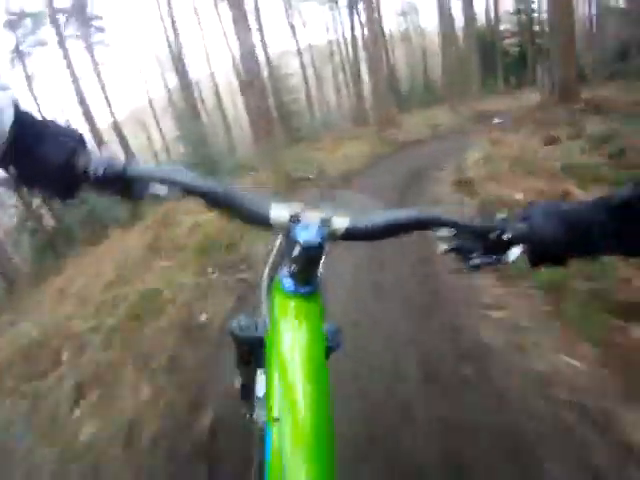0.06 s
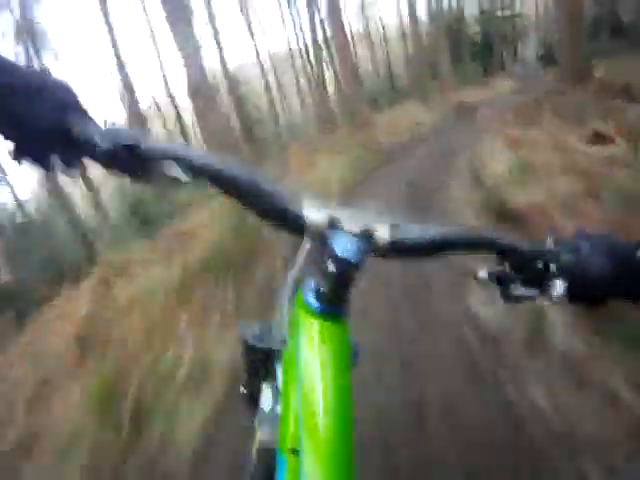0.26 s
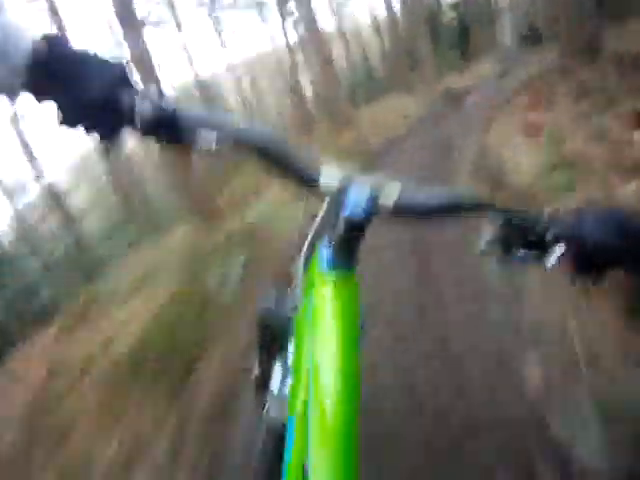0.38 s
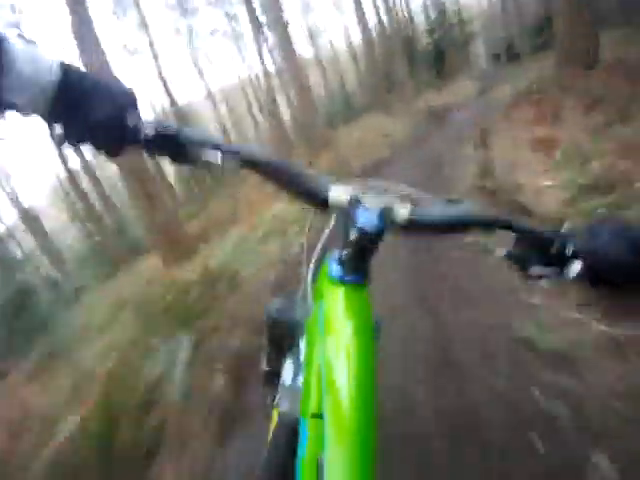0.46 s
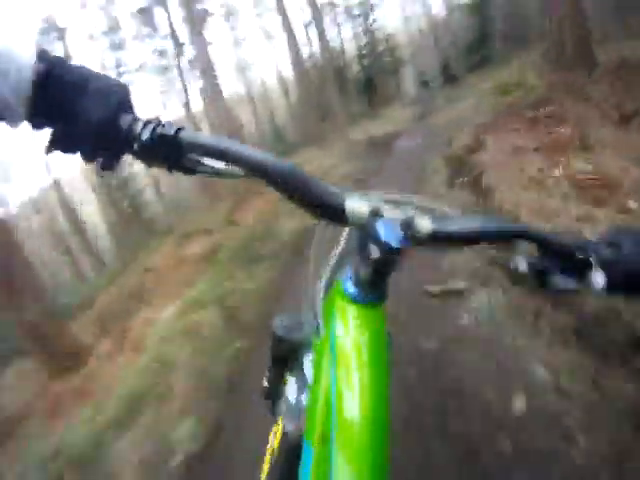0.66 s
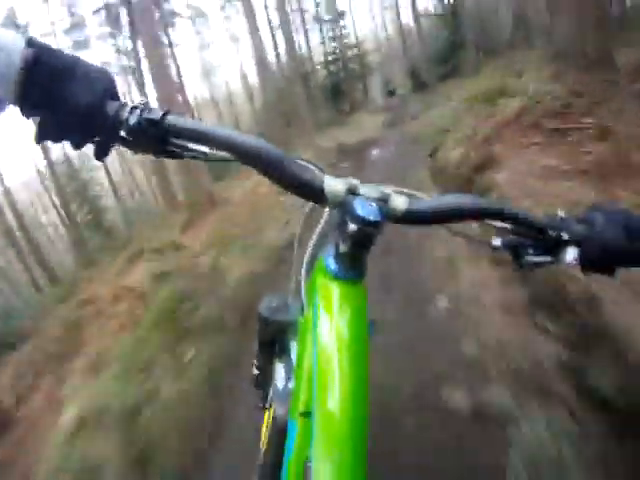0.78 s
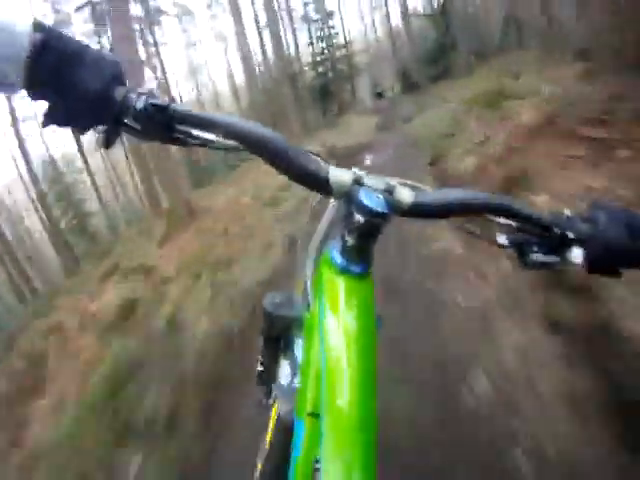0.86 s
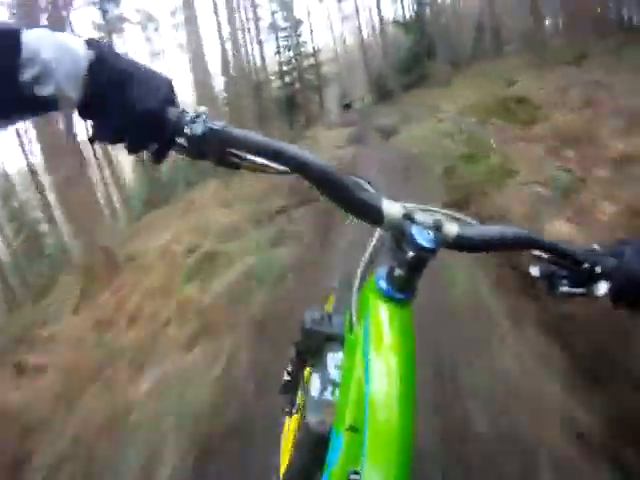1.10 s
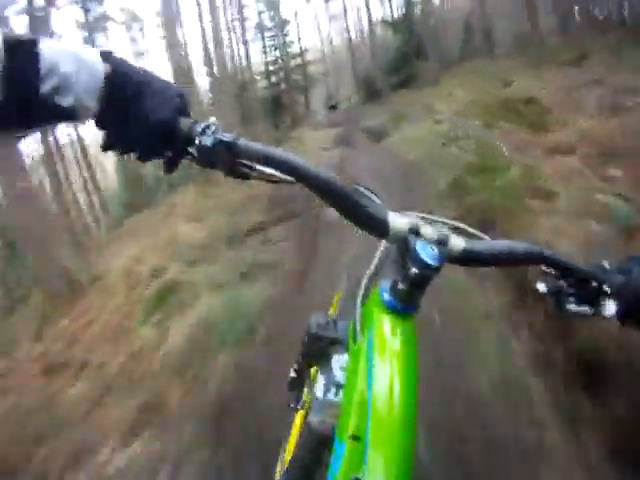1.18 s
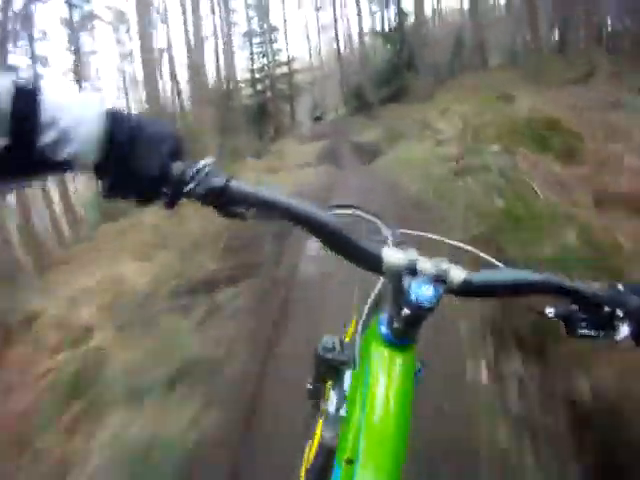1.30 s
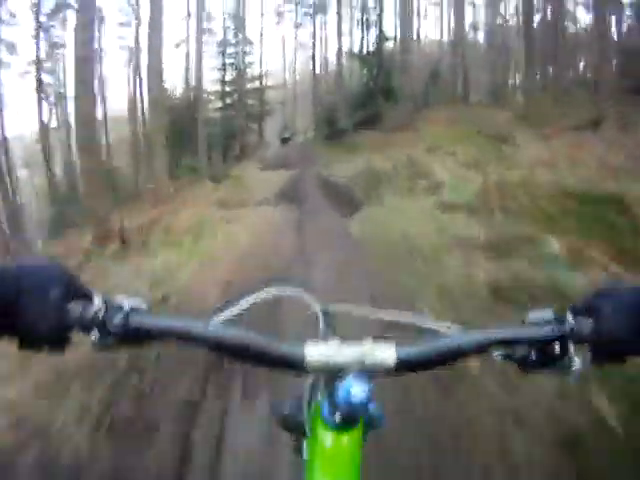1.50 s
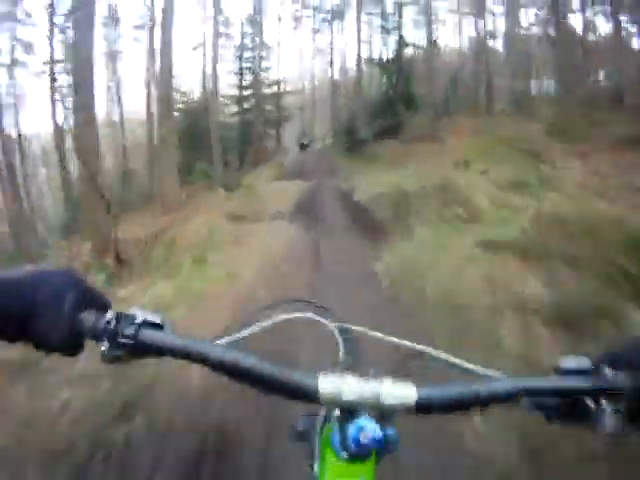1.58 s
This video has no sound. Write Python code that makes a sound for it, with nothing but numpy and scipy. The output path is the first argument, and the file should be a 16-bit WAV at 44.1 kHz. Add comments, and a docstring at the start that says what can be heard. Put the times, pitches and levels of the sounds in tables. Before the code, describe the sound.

A mountain bike rattles down a dirt trail, heard from a microphone on the rider. Sharp plastic clacks, chain ticks and wheel thumps cluster early, then ease into lighter chatter over tyre hiss and low wind rumble.

```python
"""A mountain bike runs down a dirt trail, heard from a camera in a plastic housing on the rider.
It opens on a bed of wind rumble, gritty tyre hiss and fine chatter, with a few light clacks.
From 0.24 s a rough patch hits: the housing clacks and knocks in its mount, chain and cables tick
and the wheels thump. The hardest clack overloads the microphone at 0.4 s; the frame shudders at 0.6 s.
After 0.75 s the ride settles back to the bed, with softer bumps and stray ticks and clacks."""
import sys
import numpy as np
from scipy import signal
from scipy.fft import rfft, irfft
from scipy.io import wavfile

SR = 44100
rng = np.random.default_rng(int(sys.argv[2]) if len(sys.argv) > 2 else 0)


def unload_audio(sound):
    """Save the sound as a 16-bit wav file, at the path given as the first command line argument."""
    columns = np.transpose(np.atleast_2d(sound))
    # keep every value between -1 and 1, then stretch to whole-number steps
    steps = np.round(np.clip(columns, -1, 1) * 32767)
    wavfile.write(sys.argv[1], SR, steps.astype(np.int16))


N = 72765
TIME = np.arange(N) / SR

# fader for the wind buffeting: t/s, level/dB
WIND_FADER = [(0, -51), (.06, -40), (.13, -42.5), (.22, -47), (.29, -39.5), (.37, -39), (.43, -31.5),
              (.52, -34.5), (.6, -33), (.67, -33), (.77, -41), (.87, -41.5), (1.05, -47.5), (1.15, -46),
              (1.3, -43), (1.44, -53), (1.54, -41), (1.65, -55)]
# tone of the wind: f/Hz, level/dB
WIND_EQ = [(10, -10.5), (25, 2), (50, -9.5), (100, -18), (200, -39), (1000, -83)]
# fader for the ground rumble through bike and rider: t/s, level/dB
GROUND_FADER = [(0, -51.5), (.03, -46), (.07, -56.5), (.2, -62), (.26, -43), (.34, -41), (.38, -38.5),
                (.45, -41), (.5, -47), (.54, -44.5), (.6, -31), (.67, -55.5), (.74, -41.5), (.8, -54),
                (.94, -54), (1.05, -57.5), (1.14, -54), (1.22, -54), (1.33, -51), (1.42, -54.5),
                (1.53, -48), (1.65, -58.5)]
# tone of the ground rumble: f/Hz, level/dB
GROUND_EQ = [(30, -26), (80, 3), (130, 1), (200, -3.5), (290, -10.5), (420, -20), (700, -21.5), (1200, -51),
             (3000, -58)]
# fader for the tyres on dirt: t/s, level/dB
TYRE_FADER = [(0, -47), (.13, -48), (.22, -49), (.32, -44.5), (.42, -41.5), (.51, -46.5), (.6, -43.5),
              (.76, -43), (.9, -44.5), (1.05, -47.5), (1.15, -46), (1.22, -47.5), (1.44, -46), (1.65, -47)]
# tone of tyre noise and clack grit through the housing: f/Hz, level/dB
GRIT_EQ = [(200, -30), (400, -13), (780, -12), (1130, -4.5), (1280, -11), (1550, -12.5), (1800, -2),
           (1920, 4.5), (2200, -4), (2540, -3), (2780, -5.5), (3200, 1), (3650, -9.5), (4300, -10.5),
           (5600, -13), (7500, -16), (8600, -11), (10200, -13.5), (11400, -35), (12800, -19.5),
           (14300, -18), (15300, -13)]
# fader for the chatter of loose parts: t/s, level/dB
CHATTER_FADER = [(0, -41), (.06, -48), (.088, -46.5), (.12, -55.5), (.22, -47.5), (.3, -38.5), (.325, -34),
                 (.342, -26.5), (.37, -42.5), (.41, -28), (.445, -42.5), (.47, -40.5), (.505, -59),
                 (.545, -34.5), (.58, -48.5), (.6, -33), (.625, -45.5), (.72, -41.5), (.745, -43),
                 (.775, -37), (.8, -50.5), (.88, -49), (.905, -42), (.94, -53.5), (1, -48), (1.05, -58),
                 (1.15, -50), (1.23, -58), (1.31, -42.5), (1.35, -59), (1.44, -46), (1.5, -51.5),
                 (1.65, -52)]
# bumps under the wheels: t/s, level/dB, half width/s
BUMP_CUES = [(0.0258, -31.5, 0.0017), (0.033, -32, 0.0017), (.056, -32, 0.011), (0.2445, -29.5, 0.0019),
             (0.266, -36, 0.0028), (0.2841, -16, 0.0016), (0.408, -27, 0.0017), (0.4221, -18.5, 0.0019),
             (.462, -23.5, 0.0029), (0.497, -28, 0.0018), (.527, -25, 0.0038), (.566, -22.5, 0.0034),
             (0.604, -16.5, 0.0031), (0.613, -20, 0.0045), (0.641, -18, .0015), (0.7427, -15, 0.0032),
             (0.825, -31, 0.0097), (0.945, -22, 0.0073), (1.135, -25.5, 0.0029), (1.168, -35, 0.0044),
             (1.36, -31, 0.0091), (1.546, -30.5, 0.0032)]
# ticks of chain and cables: t/s, level/dB
TICK_CUES = [(.2541, -31), (.4395, -29), (.4872, -20), (.6047, -15.5), (.6105, -28), (.823, -31.5),
             (.851, -32.5), (.955, -44), (1.271, -38), (1.401, -38)]
# ring of the ticking metal: f/Hz, t60/s, level/dB
METAL_MODES = [(2010, 0.019, -8.5), (3717, 0.012, -1.5), (4120, 0.0089, -5.5), (4960, 0.024, -19.5),
               (7640, 0.0076, -7), (8260, 0.013, -8), (9800, 0.0092, -17)]
# ring of the housing: f/Hz, t60/s, level in a sharp clack/dB, level in a dull knock/dB
PLASTIC_MODES = [(246, 0.033, -21.5, -22.5), (649, 0.021, -21.5, -22.5), (1165, 0.021, -18, -10),
                 (1494, 0.016, -27, -6.5), (1880, 0.015, -2.5, -4), (2226, .011, 5, -2),
                 (2481, 0.012, -5.5, -18), (3603, 0.01, -4, -24.5), (5180, 0.0039, -4, -16.5),
                 (6790, 0.004, -8, -17), (8426, 0.014, -13.5, -30), (9736, 0.012, -8.5, -15.5),
                 (10530, 0.005, -28, -9.5), (14220, 0.0098, -9, -12.5)]
# the housing slaps its hard stop: t/s, level/dB, low cut/Hz
CLACK_CUES = [(.0802, -26.5, 1480), (.083, -35, 1500), (0.0886, -26, 1485), (0.196, -28.5, 1500),
              (0.2427, -0.5, 1550), (0.3392, -28, 400), (0.4039, 4, 150), (.5462, -27, 600),
              (0.6682, -24.5, 600), (.9015, -29, 1000), (1.437, -32, 1500)]
# it falls back on the padded stop: t/s, level/dB
KNOCK_CUES = [(0.2818, 1.5), (0.4181, -1.5), (0.5099, -20), (0.573, -20.5), (.6367, -3.5)]
# three narrow dips from the housing, then two notches from the camera's filters: f/Hz, width/Hz, depth/dB
NOTCHES = [(891, 180, -4), (1348, 27, -9), (3007, 83, -6.5), (5994, 740, -29), (12250, 1900, -22)]

CLACK_ATTACK_S, KNOCK_ATTACK_S = 0.0011, 0.00079


def from_db(db):
    """Decibels to gain."""
    return 10 ** (np.asarray(db) / 20)


def rms_one(x):
    """Scale to unit rms."""
    return x / np.sqrt(np.mean(x ** 2) + 1e-20)


def fader(curve):
    """Ride the gain along rows of t/s, level/dB."""
    return from_db(np.interp(TIME, *np.transpose(curve)))


def equalise(x, eq):
    """Shape a steady sound with rows of f/Hz, level/dB; rms 1."""
    hz, db = np.transpose(eq)
    bins_hz = np.maximum(np.fft.rfftfreq(N, 1 / SR), 1)
    gain = from_db(np.interp(np.log(bins_hz), np.log(hz), db))
    return rms_one(irfft(rfft(x) * gain, N))


def low_cut(x, hz):
    """Roll off the lows below hz."""
    return signal.sosfilt(signal.butter(2, hz, "high", fs=SR, output="sos"), x)


def drift(rate_hz):
    """Slow random wander; rms 1."""
    smoothing = signal.butter(2, rate_hz, fs=SR, output="sos")
    return rms_one(signal.sosfilt(smoothing, rng.standard_normal(2 * N))[N:])


def grains(per_s, spread_db):
    """A scatter of clicks of uneven size."""
    sizes = from_db(spread_db * np.minimum(rng.exponential(1, N), 4)) * rng.choice([-1, 1], N)
    return sizes * (rng.random(N) < per_s / SR)


def ring(modes, start_s, attack_s):
    """One hit on modes of f/Hz, t60/s, level/dB: a quick swell, then each mode dies away."""
    t = np.maximum(TIME[:N // 10] - start_s % (1 / SR), 0)
    tone = sum(from_db(db - 60 * t / t60) * np.sin(2 * np.pi * hz * t) for hz, t60, db in modes)
    attack = 1 - np.exp(-(t / attack_s) ** 2)
    return np.concatenate([np.zeros(int(start_s * SR)), tone * attack, np.zeros(N)])[:N]


def rumble():
    """The low bed: wind buffets the microphone and rough ground drums a little higher."""
    wind, ground = rng.standard_normal((2, N))
    buffeting = fader(WIND_FADER) * equalise(wind, WIND_EQ)
    drumming = fader(GROUND_FADER) * equalise(ground, GROUND_EQ)
    return buffeting + drumming


def tyres():
    """Fluttering hiss and grit of tyres on dirt, coloured by the housing."""
    grit = from_db(-3) * rms_one(grains(per_s=700, spread_db=2))
    flutter = from_db(1.8 * drift(rate_hz=100))
    hiss = rng.standard_normal(N)
    return fader(TYRE_FADER) * equalise((hiss + grit) * flutter, GRIT_EQ)


def chatter(decay_scale=0.72):
    """Trail vibration keeps up a dense run of tiny, short taps on both stops of the housing."""
    out = 0
    for stop in range(2):  # hard, then padded
        modes = [(hz, t60 * decay_scale, dbs[stop]) for hz, t60, *dbs in PLASTIC_MODES]
        taps = grains(per_s=1100, spread_db=4)
        out += rms_one(signal.fftconvolve(taps, ring(modes, 0, KNOCK_ATTACK_S))[:N])
    return fader(CHATTER_FADER) * rms_one(out)


def chain_ticks():
    """Bright detail on top: chain and cables make light metal contacts."""
    return sum(from_db(db) * ring(METAL_MODES, s, attack_s=0.00024) for s, db in TICK_CUES)


def wheel_bumps():
    """The weight of the ride: each bump is a soft push that swings back."""
    pushes = sum(-from_db(db) * np.exp(-.5 * ((TIME - s) / width) ** 2) for s, db, width in BUMP_CUES)
    return low_cut(pushes, hz=12.2)  # the low cut gives the swing back


def frame_shudder(at_s=.6085, hz=69.2, db=-15.5, half_width_s=.013):
    """A hard hit shakes the frame for a few deep cycles."""
    t = TIME - at_s
    return from_db(db) * np.exp(-.5 * (t / half_width_s) ** 2) * np.cos(2 * np.pi * hz * t)


def housing_knocks(bounce_s=.003, bounce_db=-15):
    """Dull knocks: the housing drops on its padded stop and bounces once."""
    dull = [(hz, t60, db) for hz, t60, _, db in PLASTIC_MODES]
    out = 0
    for s, db in KNOCK_CUES:
        bounce = from_db(bounce_db) * ring(dull, s + bounce_s, KNOCK_ATTACK_S)
        out += from_db(db) * (ring(dull, s, KNOCK_ATTACK_S) + bounce)
    return out


def housing_clacks(crunch_db=-21.5, crunch_peak_s=.0014):
    """The lead sound: the housing slaps its hard stop and rings, and the faces grind for a moment."""
    sharp = [(hz, t60, db) for hz, t60, db, _ in PLASTIC_MODES]
    grind = from_db(crunch_db) * equalise(rng.standard_normal(N), GRIT_EQ)
    out = 0
    for s, db, low_hz in CLACK_CUES:
        age = np.maximum(TIME - s, 0) / crunch_peak_s
        crunch = grind * age * np.exp(1 - age)
        clack = ring(sharp, s, CLACK_ATTACK_S) + crunch
        out += from_db(db) * low_cut(clack + 1e-18, low_hz)  # the tiny offset keeps the filter fast
    return out


def scene():
    """All layers meet in one dry mono mix."""
    housing = housing_clacks() + housing_knocks() + chatter()
    bike = chain_ticks() + wheel_bumps() + frame_shudder() + tyres()
    return (housing + bike + rumble())[None]


def record(dry, ceiling=0.8, high_cut_hz=15850):
    """The microphone overloads on the hardest clack and the housing hollows out three narrow dips;
    the camera's own filters notch 6 and 12 kHz, and the top is lost."""
    out = np.clip(dry, -ceiling, ceiling)
    for hz, width_hz, depth_db in NOTCHES:
        notched = signal.lfilter(*signal.iirnotch(hz, hz / width_hz, fs=SR), out)
        out = notched + from_db(depth_db) * (out - notched)
    return signal.sosfilt(signal.cheby2(16, 60, high_cut_hz, fs=SR, output="sos"), out)


dry = scene()
out = record(dry)
unload_audio(out)
```